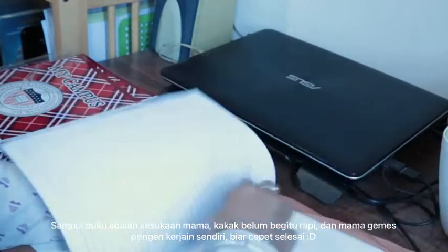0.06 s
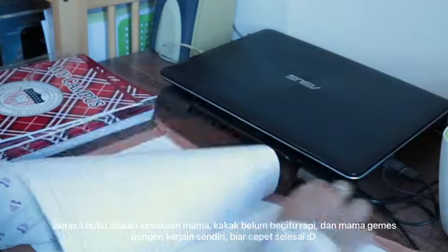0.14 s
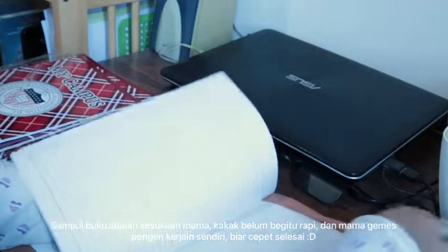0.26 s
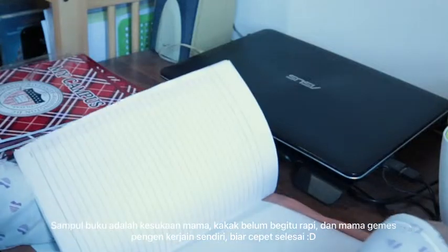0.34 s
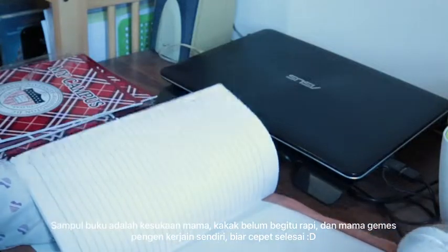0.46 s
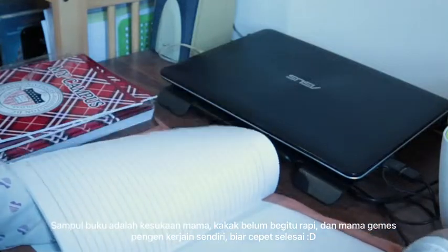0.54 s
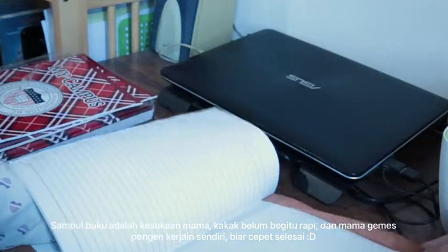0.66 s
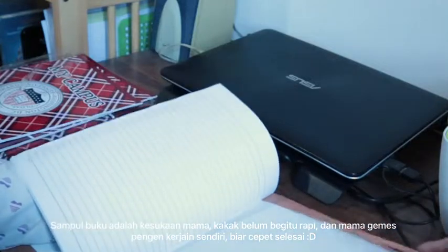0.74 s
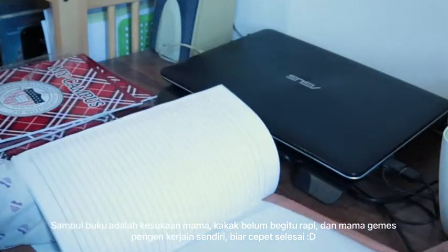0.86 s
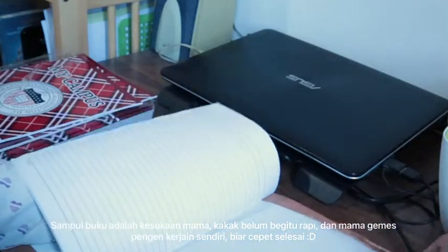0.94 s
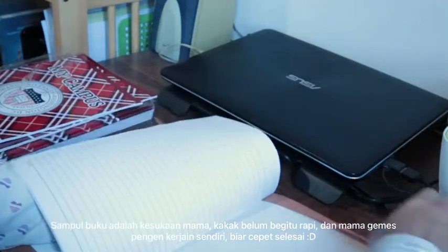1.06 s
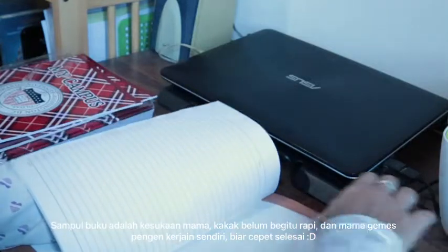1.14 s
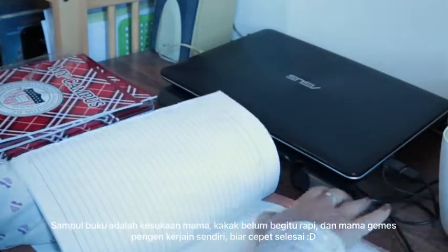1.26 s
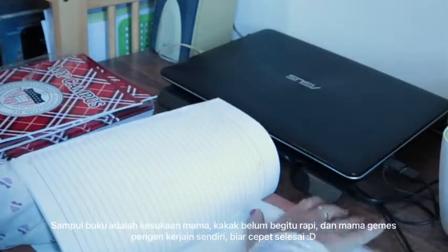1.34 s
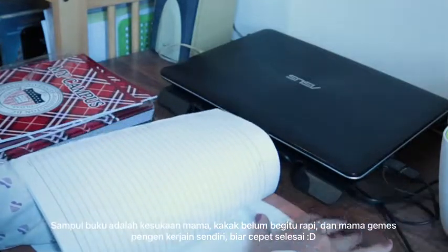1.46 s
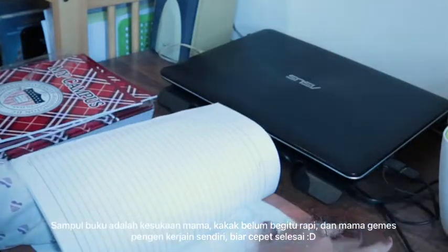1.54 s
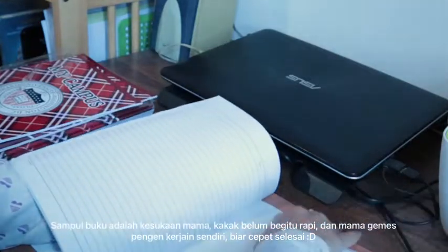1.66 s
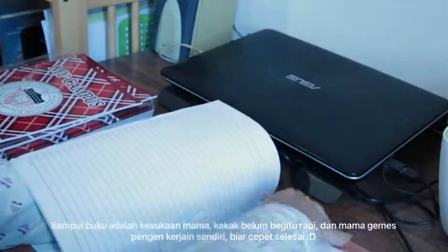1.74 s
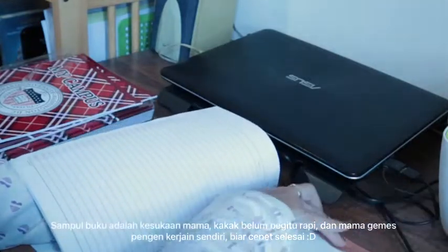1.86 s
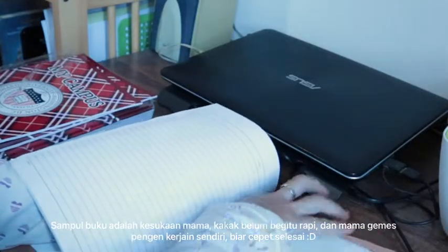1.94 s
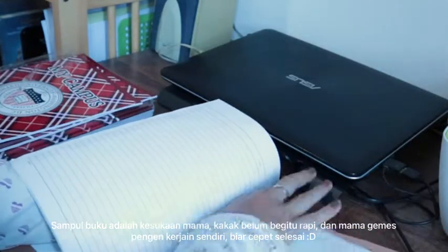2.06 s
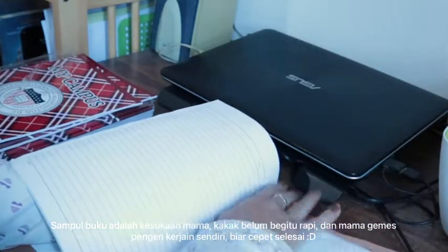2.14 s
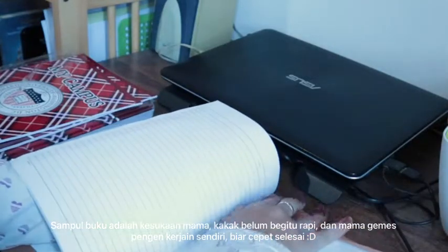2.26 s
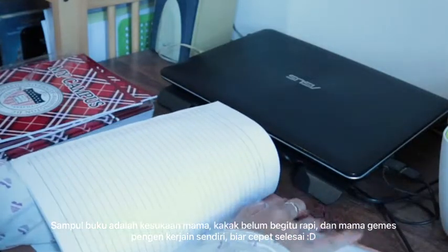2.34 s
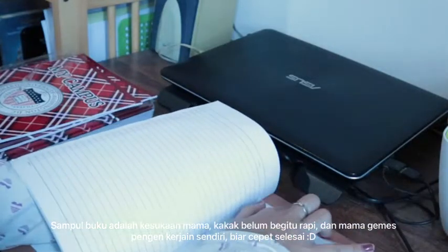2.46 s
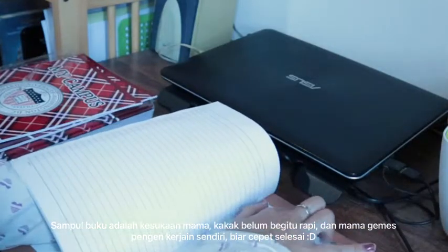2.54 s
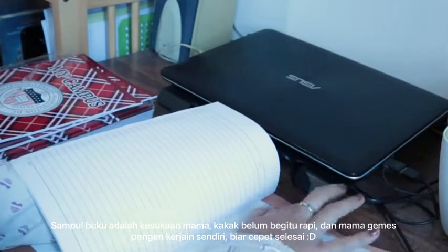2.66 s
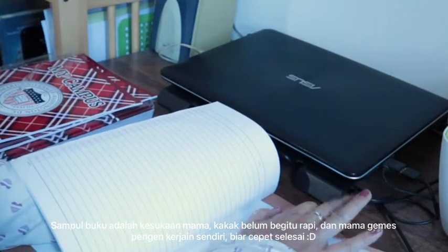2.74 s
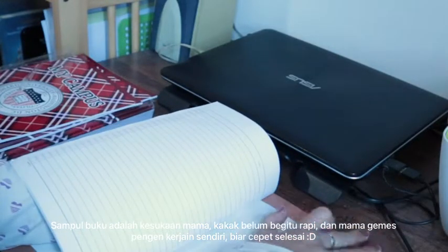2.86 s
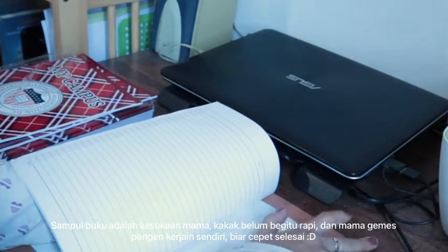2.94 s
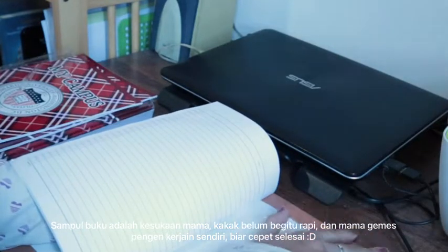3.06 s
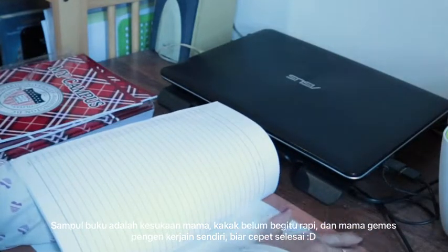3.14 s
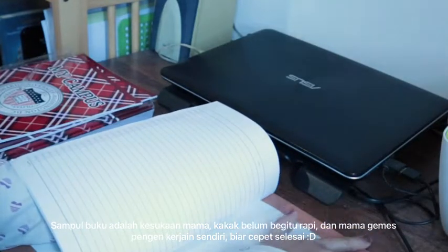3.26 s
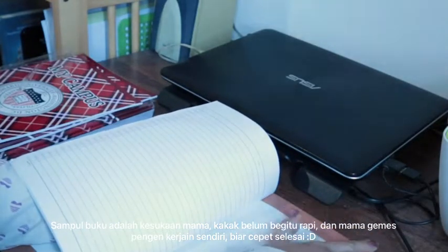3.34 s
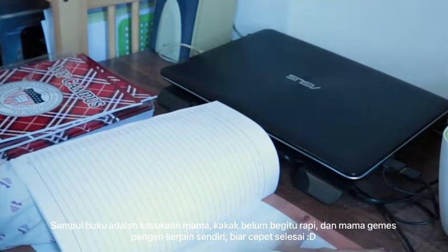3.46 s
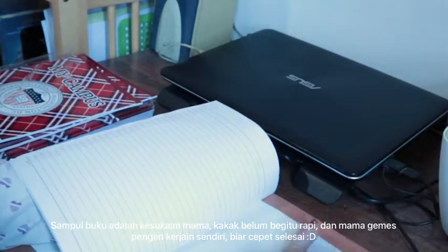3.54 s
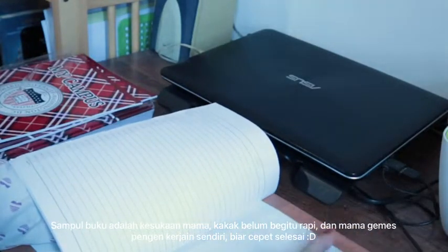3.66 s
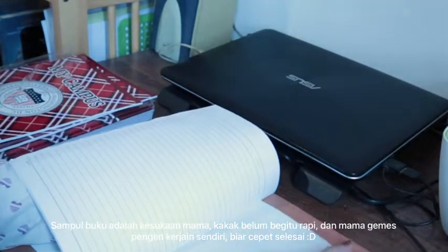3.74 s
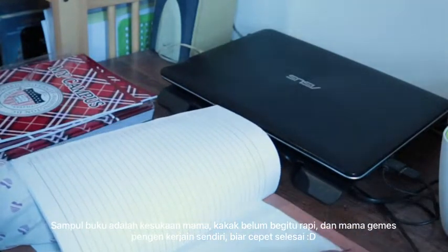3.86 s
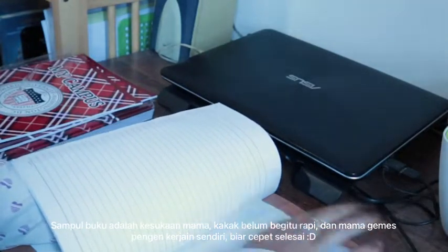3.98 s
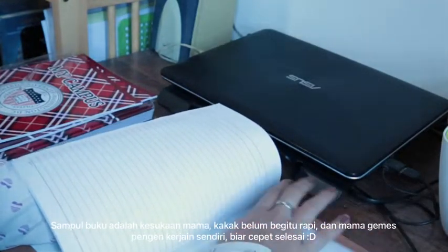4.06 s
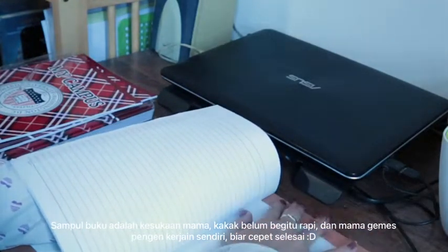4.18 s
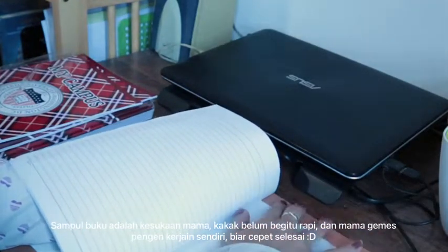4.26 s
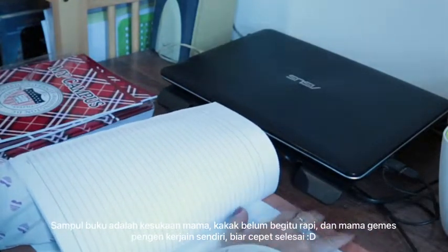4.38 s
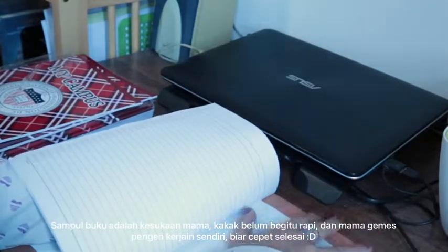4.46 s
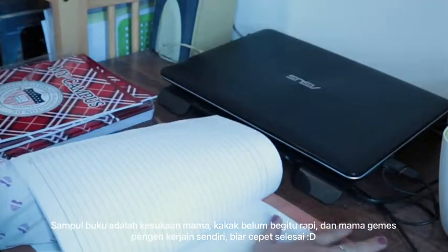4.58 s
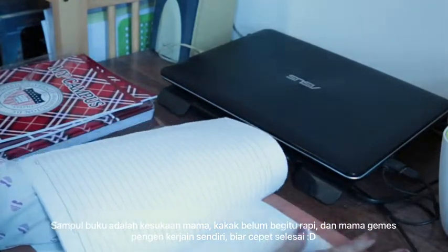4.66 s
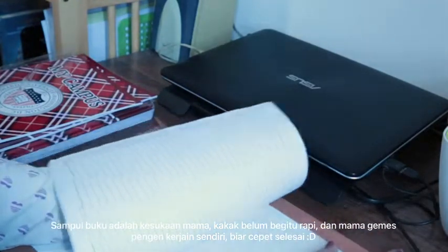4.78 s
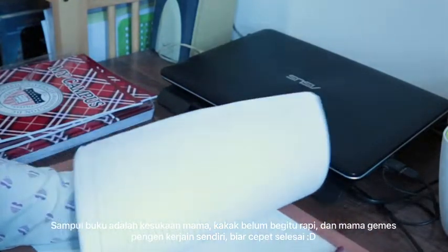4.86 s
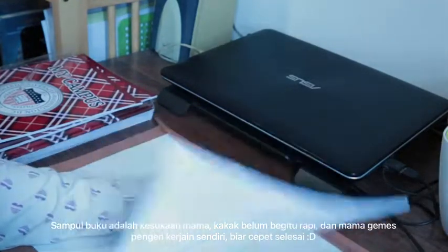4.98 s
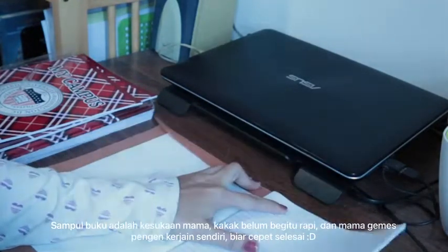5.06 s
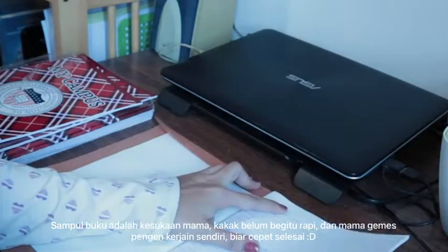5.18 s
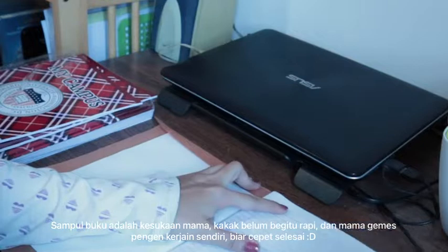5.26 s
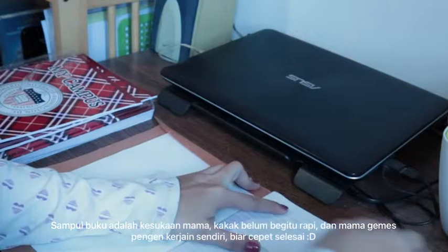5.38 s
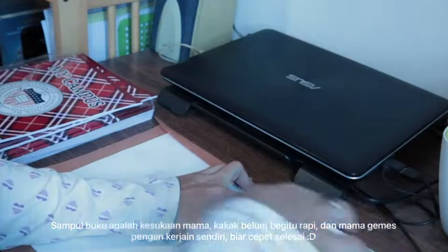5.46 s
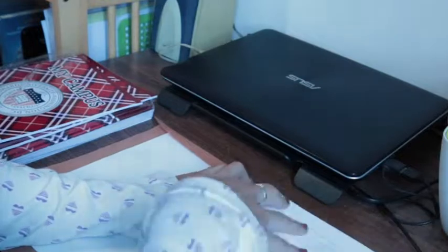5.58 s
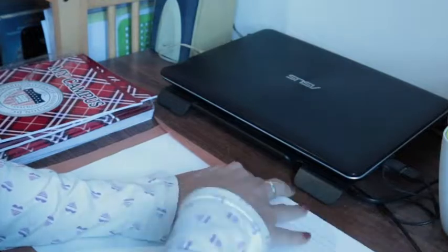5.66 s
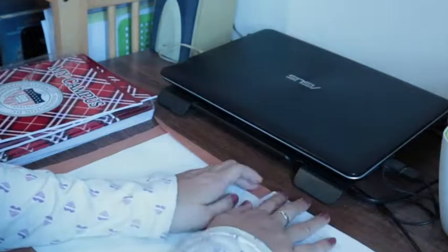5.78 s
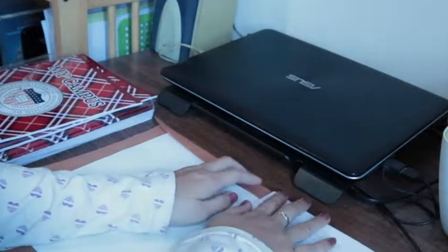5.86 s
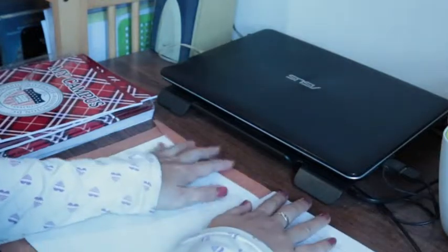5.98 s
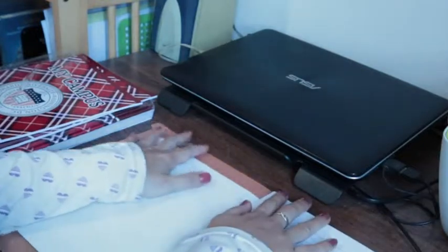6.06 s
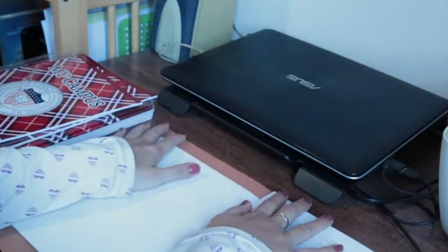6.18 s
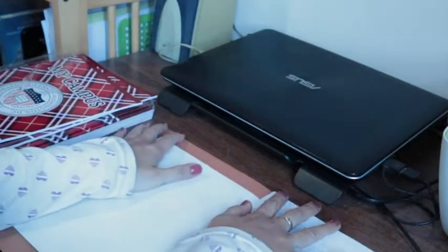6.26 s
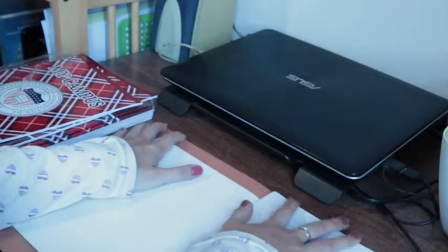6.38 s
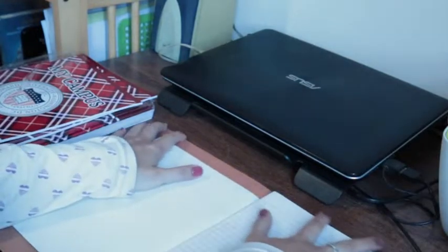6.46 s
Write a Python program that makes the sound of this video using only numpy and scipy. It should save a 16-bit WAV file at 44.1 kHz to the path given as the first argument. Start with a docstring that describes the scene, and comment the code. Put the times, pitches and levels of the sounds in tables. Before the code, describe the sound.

Close paper rustling and crackling in a small room, a sharp tap, then a loud page slap and soft thuds of hands on a desk.

```python
"""A wooden desk in a small room: hands smooth and handle sheets of paper and a notebook.
Rustle, skin hiss and page flexing are filtered noise and micro-slips, swelled by each hand stroke.
Snaps, taps and a loud slap are noise bursts ringing the paper; palms thud as decaying sines, the desk modes.
Sharp sounds and thuds feed random-tap room tails; a pair of close microphone ports hears all over a low rumble."""
import sys
import numpy as np
from scipy import signal
from scipy.fft import rfft, irfft
from scipy.io import wavfile
from scipy.ndimage import uniform_filter1d

SR = 44100
rng = np.random.default_rng(int(sys.argv[2]) if len(sys.argv) > 2 else 0)


def master(y):
    """Save y as 16-bit WAV."""
    cut = np.clip(np.atleast_2d(y).T, -1, 1)
    pcm = np.round(cut * 32767)  # scale
    wavfile.write(sys.argv[1], SR, pcm.astype(np.int16))


N = 287091

# Hand strokes over the sheet: top t/s, rise/s (10 ms minimum), fall/s, rustle level/dB, skin hiss level/dB,
# rustle centre f/Hz, crackle share (0-1)
HAND_STROKES = [(0.0, .05, 0.13, -38, -51, 2540, 0.09), (0.12, 0.074, 0.12, -35, -40, 2220, 0),
                (0.29, 0.082, 0.078, -38, -43, 2900, 0.12), (0.4, 0.11, 0.6, -46, -54, 1710, 0.1),
                (0.58, 0.012, 0.041, -41.5, -44, 1930, 0.8), (0.671, 0.04, 0.042, -27, -34.5, 2020, 0.16),
                (0.74, 0.051, 0.074, -32.5, -40.5, 2110, 0.23),
                (0.92, 0.058, 0.057, -34, -43.5, 1900, 0.01), (1.113, 0.0076, 0.13, -41, -50, 2050, 0.9),
                (1.25, 0.27, 0.45, -43.5, -57, 1760, 0.2), (1.41, 0.12, 0.053, -39.5, -45.5, 2050, 0.7),
                (1.5, 0.097, 0.088, -41, -45.5, 2320, 0.04), (1.62, 0.044, 0.14, -43, -50.5, 2240, 0),
                (1.8, 0.2, 0.091, -42, -63, 2390, 0), (1.89, 0.15, 0.094, -43, -50, 2060, 0.07),
                (2.01, 0.05, 0.086, -47, -52.5, 2020, 0.55), (2.17, 0.077, 0.066, -40.5, -48, 1960, 0.1),
                (2.26, 0.14, 0.11, -46.5, -47.5, 2690, 0.04), (2.41, 0.082, 0.12, -45.5, -48.5, 2160, 0),
                (2.61, 0.16, 0.15, -47, -50.5, 2000, 0.14), (2.85, 0.09, 0.16, -44.5, -45.5, 2750, 0.2),
                (2.99, 0.051, 0.08, -63, -47, 2130, 0.1), (3.04, 0.055, 0.11, -50, -50.5, 2670, 0),
                (3.21, 0.16, 0.42, -44, -47, 2680, 0.54), (3.37, 0.041, 0.17, -39, -44, 2750, 0),
                (3.7, 0.43, 0.13, -42, -49.5, 2190, 0.04), (3.86, 0.048, 0.77, -45, -48, 2020, 0),
                (4.169, 0.021, 0.04, -37, -49, 2305, 0.95), (4.31, 0.056, 1, -50.5, -65, 2350, 0.17),
                (4.5, 0.38, 0.96, -52, -47.5, 2300, 0.04), (4.68, 0.17, 0.2, -39.5, -45.5, 2630, 0.13),
                (4.85, 0.39, 0.18, -41.5, -62, 1880, 0), (5.06, 0.12, 0.037, -48, -53, 2100, 0.7),
                (5.16, 0.11, 0.14, -38.5, -76, 1880, 0), (5.29, 0.09, 0.088, -40, -51.5, 1950, 0.04),
                (5.36, 0.08, 0.053, -45, -48, 2250, 0.7), (5.75, 0.15, 0.11, -45, -52.5, 1920, 0.2),
                (5.81, 0.058, 0.028, -49, -67, 1320, 0.2), (5.89, 0.04, 0.069, -46.5, -46, 3430, 0.1),
                (6.0, 0.17, 0.23, -41.5, -43.5, 2700, 0.1), (6.48, 0.21, .2, -41, -43.5, 2250, 0)]
# Dull flexing of the pages: t/s, level/dB
PAGE_FLEXING = [(0.0, -44.5), (0.2, -42.5), (0.55, -46.5), (1.0, -48), (1.4, -48.5), (2.2, -49.5),
                (2.75, -50), (3.1, -49.5), (3.35, -49.5), (3.55, -45), (3.9, -49.5), (4.3, -48),
                (4.95, -47.5), (5.15, -51.5), (5.6, -54.5), (5.95, -48), (6.51, -49)]
# Sharp paper sounds: snaps, taps and a loud slap:
# t/s, peak level/dB, ring f/Hz, ring boost/dB, treble/dB, t60/ms (60 maximum), bass/dB
SHARP_SOUNDS = [(0.026, -23.5, 2600, -9, 0, 43, -2), (0.111, -20.5, 2870, 10, 3, 18, 8),
                (0.12, -22.5, 860, 17.5, 3, 71, -4), (0.148, -18.5, 1260, 8.5, -8, 22, 9),
                (0.235, -20.5, 2530, 9.5, 12, 51, 11), (0.274, -25, 2920, 10, 8, 25, -8),
                (0.284, -21.5, 2800, 7, 8, 44, -10), (0.298, -12.5, 3020, 8, 17, 13.3, 10),
                (0.447, -18.5, 1200, 4.5, -27, 29, -1), (0.502, -25, 1300, 15, -5, 38, -9),
                (0.513, -22.5, 1440, 12, 9, 33, -1), (0.575, -27, 1980, -3, 33, 20, -2),
                (0.585, -22, 2820, 4, 4, 27, -5), (0.624, -23, 1670, 13, 3, 33, 0),
                (0.632, -18, 1690, 18.5, -3, 53, 4), (0.649, -24, 1500, 17, 7, 18, 3),
                (0.656, -18, 1900, 8, 12, 20, -5), (0.6605, -9.5, 1800, 10, 8, 20, -10),
                (0.665, -18, 2300, 6, 18, 21, -1), (0.674, -15, 1900, -1, 5, 47, 2.5),
                (0.694, -12.5, 1500, 8, 11, 35, -3), (0.7245, -7, 2380, 17.5, 17, 20, -6),
                (0.729, -21, 1990, 7, 8, 18, 10), (0.929, -19.5, 2230, -4.5, 8, 27, -9),
                (0.944, -33, 2270, -9, -5, 16, 6), (1.107, -27, 1650, -12, 12, 22, -1),
                (1.22, -22, 880, 12, -20, 20, 8), (1.273, -28.5, 2030, 15, -9, 16, 6),
                (1.245, -29, 2680, 17, 4, 18, -8), (1.307, -27, 2530, 4, -3, 46, -6),
                (1.325, -21.5, 1200, 9, -2, 54, -9), (1.339, -17.5, 2070, 5, -15, 87, -7),
                (1.373, -18.5, 1640, 11, 0, 20, -3), (1.378, -18.5, 2190, 5, -2, 56, -27),
                (1.402, -16.5, 2170, -7, 9, 17, -8), (1.47, -23, 2270, 28, 0, 12, -13),
                (1.482, -20, 2360, 16, -2, 10, -10), (1.502, -19.5, 1980, 4.5, 25, 17.4, -9),
                (1.621, -29.5, 2370, 19, 17, 22, -2), (1.868, -18.5, 2000, 18, -19, 7.1, 13),
                (1.87, -18, 1670, 5, -19, 21, -3), (1.909, -23, 2600, 6, 3, 22, -1),
                (1.919, -24.5, 2070, 11, 0, 20, 11), (1.928, -24.5, 2110, 4, 3, 32, -21),
                (2.033, -30.5, 1520, 9, -15, 11, 0), (2.126, -34, 3670, 30, 11, 28, -9),
                (2.298, -34, 2290, 19, 10, 16, -2), (2.417, -28, 1900, 6, 4, 41, -7),
                (2.458, -28.5, 1360, 3, 9, 18, -3), (2.498, -25.5, 3400, 3, -2, 11, -3),
                (2.601, -26, 3500, 11, 16, 7.3, -5), (2.603, -19, 1300, 6.5, 18, 19, 2),
                (2.792, -20.5, 1620, -12, 16, 19, -4), (2.804, -24.5, 1510, 19, 1, 31, -9),
                (2.8318, -17, 3220, 14, 22, 14, -3), (2.884, -21, 1580, -6, 21, 22, -3),
                (2.893, -28.5, 1500, 10, 0, 15, -10), (2.909, -26, 2400, -6, 0, 10, -6),
                (2.938, -32, 2270, 1, 1, 20, 1), (2.961, -14.5, 2140, 10, 28, 16, -10),
                (2.995, -35, 2100, 2, 0, 14, 0.5), (3.032, -24, 3040, 6, 7, 18, -5),
                (3.127, -25.5, 2550, 13, 7, 19, -17), (3.137, -23, 3100, 8, 15, 14, -15),
                (3.154, -31, 2600, 6, 17, 11, -13), (3.174, -26, 2500, 6, 5, 25, -10),
                (3.182, -22.5, 2940, 18, 12, 36, -14), (3.204, -24, 3330, 25, 10, 9.1, -15),
                (3.214, -26, 2710, 17, 10, 15, -7), (3.244, -28, 1620, 15, 11, 34, -15),
                (3.275, -25, 2980, 0, 9, 10, -5), (3.294, -25, 3320, 16, 7, 21, -17),
                (3.311, -21, 2000, 4, 10, 22, -5), (3.341, -13.5, 2400, -1, 8, 6.7, -16),
                (3.343, -13.5, 3400, 12, 12, 7.1, -10), (3.35, -21, 4000, 17, 17, 9, -14),
                (3.366, -19, 3900, 5, 27, 50, -13), (3.384, -32, 3400, 22, 8, 12, -12),
                (3.405, -25, 3000, 10, 0, 21, -13), (3.412, -27, 3020, 12, -2, 10, -12),
                (3.428, -26, 3120, 16, 3, 14, -16), (3.494, -30.5, 2910, 11, 5, 11, -13),
                (3.504, -28.5, 2960, 16, 14, 16, -19), (3.556, -23.5, 860, 17, -32, 34, -10),
                (3.865, -4.5, 2410, 5, -24.5, 12.6, -8), (3.869, -11.5, 1980, 1, -9, 24, 1.5),
                (3.883, -21, 2070, 12, -5, 33, -1), (4.142, -28, 2160, 10, 4, 18, 12),
                (4.157, -22, 1474, -4, 3, 24, 2), (4.802, -14.5, 3080, 6.5, 12, 10, -30),
                (5.0236, -26, 2200, 12, 0, 16, -1), (5.0256, -14, 2400, 19, 3, 7.6, 5),
                (5.028, -0.5, 2500, 9, -8, 10, 6.5), (5.0308, 1.5, 2110, 12, -2, 16, 0),
                (5.033, -9.5, 790, 18.5, -27, 28, -6.5), (5.037, -5.5, 2600, 10, -21, 16, 1),
                (5.0493, -15, 1800, -2, -4, 8.6, -3), (5.059, -16.5, 850, 26, -24, 11, -2),
                (5.0615, -12.5, 1880, 21, -18, 16, -5), (5.084, -23, 2300, 6, -10, 13, -4),
                (5.202, -28, 2370, 24, -15, 16, -8), (5.227, -22.5, 1410, 4, -14, 26, 3),
                (5.244, -31, 1300, 18, -2, 18, -7), (5.37, -29, 2260, 13, 13, 21, -6),
                (5.64, -29, 1480, 28, -40, 10, -5), (5.747, -27, 1530, 1, -34, 55, 3),
                (5.762, -14.5, 1800, 1, -32, 19, -3), (5.769, -21.5, 940, 27, -38, 12, 10),
                (5.776, -21, 1300, -2, -27, 18, 8), (5.822, -30, 910, 11, -18, 25, 7),
                (5.876, -28, 1390, 17, -12, 12, 10)]
# Palms and notebook landing on the desk: t/s, peak level/dB, centre of the blow f/Hz
DESK_THUDS = [(0.183, -25, 317), (0.197, -35, 320), (0.239, -41, 197), (0.297, -25, 353), (0.307, -42, 100),
              (0.316, -37, 108), (0.722, -29.5, 420), (1.378, -40, 76.5), (1.898, -38, 108),
              (2.794, -30, 147), (2.807, -31.5, 150), (3.56, -33.5, 256), (3.87, -28.5, 244),
              (4.161, -27.5, 125), (4.188, -34, 99.6), (5.028, -38, 444), (5.045, -32, 78),
              (5.766, -27, 111), (5.775, -30.5, 380), (5.787, -30, 88.8), (5.799, -40, 99),
              (5.824, -50, 348), (5.838, -25.5, 110), (5.854, -29.5, 100), (5.871, -31.5, 140),
              (5.896, -43, 102), (5.914, -47, 90), (5.957, -41, 50.7), (5.997, -36.5, 50.4)]
# Relative spectra of the sources: f/Hz, level/dB per Hz
RUSTLE_SPECTRUM = [(290, -66), (500, -2.5), (904, -5.5), (1100, -7), (1380, -7), (2190, -9), (3910, -6.5),
                   (5350, -6), (9000, -4), (11700, -62), (19800, -120)]
HISS_SPECTRUM = [(2650, -63), (4500, -3.5), (6990, -7.5), (7320, -9.5), (8960, -6.5), (11900, -5.5),
                 (14000, -24), (15500, -40)]
FLEX_SPECTRUM = [(88, -32), (150, -5.5), (225, 0), (347, -3), (441, -3.5), (1380, -17), (1500, -13),
                 (1950, -70), (3300, -120)]
RUMBLE_SPECTRUM = [(12, -70), (20, 5), (49, 1), (92, -1), (161, -6.5), (180, -15.5), (306, -28.5),
                   (597, -14.5), (649, -24), (705, -16), (881, -23.5), (12800, -41), (15500, -88)]
SHARP_SPECTRUM = [(88, -13), (150, -12.5), (471, -5.5), (1000, -6), (1240, -4.5), (1600, -5), (2270, -6),
                  (4060, -8.5), (4930, -15), (6600, -15.5), (8000, -29.5), (11000, -25), (13000, -44),
                  (15500, -67)]
# Areas of the sheet that ring: f/Hz, width/Hz
SHEET_PATCHES = [(800, 370), (1300, 1130), (1900, 1070), (2700, 1530), (3800, 1360), (5500, 4700)]
# Modes of the desk top: f/Hz, relative level/dB, t60/s
DESK_MODES = [(50, 2.5, 0.28), (71.5, 6.5, 0.044), (95.6, 11.5, 0.087), (112, 3, 0.22), (160.4, 0, 0.24),
              (184, -10, 0.026), (240.6, -4.5, 0.17), (310, 14.5, 0.021), (393, 6.5, 0.075),
              (595, 6.5, 0.043)]
# Room decay: f/Hz, t60/s
ROOM_DECAY = [(200, 0.34), (530, 0.45), (1390, 0.3), (3680, 0.3), (9700, 0.091)]
# Likeness of the two ports: f/Hz, likeness (0-1)
PORT_LIKENESS = [(40, 0.998), (90, 0.995), (200, 0.83), (350, 0.75), (600, 0.45), (2000, 0.86),
                 (4500, 0.33), (8000, 0.35), (15000, 0.21)]
# Phase by which the left port leads: f/Hz, lead/rad
PORT_LEAD = [(40, 0.01), (200, .04), (600, .12), (1800, .22), (3360, 0.05), (4650, -.6), (6460, -3.0),
             (15000, -3.0)]
# Balance, left minus right: f/Hz, level/dB
PORT_BALANCE = [(60, -.1), (500, -.5), (2000, -1.4), (5000, -.6), (15000, -1)]

# Fade of a stroke one rise before or one fall after its top; exponent of the fade
RUSTLE_DROP_DB, HISS_DROP_DB, STROKE_EXPONENT = 12, 14, 1.26
SHAKE_DB, SHAKE_T60_S = -10, 0.22  # page shake after a thud, relative to the thud
RUMBLE_DB = -49.5
BURST_RISE_S, THUD_RISE_S = 0.00099, 0.00084
TREBLE_HZ, DULL_DB_PER_OCTAVE = 9100, 30  # treble corner; a softer contact lowers it
# Loud sharp sounds are nearest and least roomy: room dB at full scale, change in dB per dB
SHARP_ROOM_DB, SHARP_ROOM_SLOPE = -11.5, -0.18
THUD_ROOM_DB = -10.5
STRAY_DB, STRAY_HZ = -2.5, 4020  # sharp treble scattered off the sheet, unlike at the two ports
LOW_CUT_HZ, HIGH_CUT_HZ, CLIP_LEVEL = 38, 15600, 0.96
STFT_SAMPLES = 256


def gain_of(db):
    """Decibels to amplitude."""
    return 10 ** (np.asarray(db) / 20)


def evened(x):
    """Scales to rms 1."""
    return x / np.sqrt(np.mean(x ** 2) + 1e-20)


def read(points, hz):
    """Interpolates a table on a log-frequency axis."""
    f, value = np.transpose(points)
    return np.interp(np.log(hz + 1), np.log(f + 1), value)


def add(mix, s, sound):
    """Mixes a sound in at time s, in seconds."""
    part = mix[round(s * SR):][:len(sound)]
    part += sound[:len(part)]


def causal(gain_db):
    """Minimum-phase impulse response, by folded cepstrum, of a gain on rfft bins."""
    cepstrum = irfft(np.maximum(gain_db, -100) * np.log(10) / 20)
    half = len(cepstrum) // 2
    folded = np.concatenate([cepstrum[:1], 2 * cepstrum[1:half], np.zeros(half)])
    return irfft(np.exp(rfft(folded)))[:half]


def coloured(x, spectrum):
    """Passes x through a causal filter of the given spectrum."""
    response = causal(read(spectrum, np.fft.rfftfreq(4096, 1 / SR)))
    return signal.oaconvolve(x, response)[:N]


def flicker(seconds, depth_db):
    """Random gain wandering on the given time scale, with the given rms depth."""
    width = max(round(seconds * SR), 1)
    smooth = uniform_filter1d(rng.standard_normal(N), width)
    smooth = uniform_filter1d(smooth, width)
    return gain_of(depth_db * evened(smooth))


def slipping(share, median_slips_per_s, spread_db, flicker_db, grain_s):
    """Two strands of smooth sliding noise blended with clumped micro-slips of very uneven size."""
    clumps = flicker(0.012, 4.5)
    happens = rng.random(N) < median_slips_per_s * clumps / SR
    size_db = spread_db * np.minimum(rng.exponential(1, N), 2.6)
    slips = happens * gain_of(size_db)
    grain = np.exp(-np.arange(600) / (grain_s * SR))  # each slip is a very short burst
    bursts = evened(signal.oaconvolve(slips, grain)[:N])
    drive = np.sqrt(1 - share) + np.sqrt(share) * bursts
    drive *= flicker(0.0098, flicker_db)
    return drive * rng.standard_normal((2, N))


def friction(drive, spectrum, level):
    """Gives both strands the colour of the thing rubbed."""
    return level * np.array([evened(coloured(strand, spectrum)) for strand in drive])


def sheet(share, centre_hz):
    """Each area of the sheet slips on its own and rings in its own band; those near the centre lead."""
    ringing, power = 0, 0
    for hz, width_hz in SHEET_PATCHES:
        band = signal.butter(2, [hz - width_hz / 2, hz + width_hz / 2], "bandpass", fs=SR)
        weight = gain_of(-34.0 * np.log(hz / centre_hz) ** 2) * np.sqrt(width_hz)
        slips = slipping(share, 110, spread_db=5.5, flicker_db=1.65, grain_s=0.0019)
        ringing = ringing + weight * evened(signal.lfilter(*band, slips))
        power = power + weight ** 2
    return ringing / np.sqrt(power)


def strokes(t):
    """Each stroke swells to its top and fades; rustle power weights the centre and crackle."""
    top, rise, fall, rustle_db, hiss_db, centre_hz, share = np.transpose(HAND_STROKES)[:, :, None]
    before = (top - t) / np.maximum(rise, .01)
    after = (t - top) / np.maximum(fall, .01)
    away = np.maximum(before, after) ** STROKE_EXPONENT
    rustle_power = gain_of(rustle_db - RUSTLE_DROP_DB * away) ** 2 + 1e-12
    hiss_power = gain_of(hiss_db - HISS_DROP_DB * away) ** 2 + 1e-12
    rustle_sum = rustle_power.sum(axis=0)
    lead = rustle_power / rustle_sum
    rustle, hiss = np.sqrt(rustle_sum), np.sqrt(hiss_power.sum(axis=0))
    return rustle, hiss, (lead * centre_hz).sum(axis=0), (lead * share).sum(axis=0)


def flexing(t):
    """The pages flex slowly, and shake after every thud."""
    s, db, _ = np.transpose(DESK_THUDS)[:, :, None]
    shake_power = (t > s) * gain_of(db + SHAKE_DB - 60 * abs(t - s) / SHAKE_T60_S) ** 2
    slow = gain_of(np.interp(t, *np.transpose(PAGE_FLEXING)))
    return np.sqrt(slow ** 2 + shake_power.sum(axis=0))


def hands():
    """Rustle of the sheet, hiss of skin on paper and dull flexing of the pages, all friction noise."""
    steps_s = np.arange(0, N / SR + .002, .002)
    t = np.arange(N) / SR
    curves = (*strokes(steps_s), flexing(steps_s))
    rustle_level, hiss_level, centre_hz, share, flex_level = (np.interp(t, steps_s, c) for c in curves)
    share = np.clip(share, 0, 1)
    skin = slipping(0.5 * share, 400, spread_db=3.5, flicker_db=1.17, grain_s=0.0015)
    pages = slipping(0.11 * share, 120, spread_db=8, flicker_db=0.0, grain_s=0.004)
    rustle = friction(sheet(share, centre_hz), RUSTLE_SPECTRUM, rustle_level)
    hiss = friction(skin, HISS_SPECTRUM, hiss_level)
    flex = friction(pages, FLEX_SPECTRUM, flex_level)
    return rustle + hiss + flex


def rumble():
    """Murmur of the room: low rumble and faint hiss as filtered noise, wavering slightly."""
    pair = [evened(coloured(n, RUMBLE_SPECTRUM)) for n in rng.standard_normal((2, N))]
    return gain_of(RUMBLE_DB) * np.array(pair) * flicker(0.16, 1.0)


def sharp_sounds():
    """Snaps, taps and a slap: short bursts ringing the paper around; returns direct sound and room feeds."""
    direct, feeds = np.zeros(N), np.zeros((3, N))  # three spots on the desk, each with its own echoes
    hz, t = np.fft.rfftfreq(2048, 1 / SR), np.arange(3000) / SR
    noise = rng.standard_normal((len(SHARP_SOUNDS), len(t)))
    spots = rng.integers(0, len(feeds), len(SHARP_SOUNDS))
    for row, n, spot in zip(SHARP_SOUNDS, noise, spots):
        s, db, ring_hz, boost_db, treble_db, t60_ms, bass_db = row
        ring_db = boost_db / (1 + (np.log((hz + 1) / ring_hz) / 0.32) ** 2)
        corner_hz = TREBLE_HZ * 2 ** (min(treble_db, 0) / DULL_DB_PER_OCTAVE)
        tilt_db = treble_db / (1 + (corner_hz / (hz + 1)) ** 4)
        tilt_db += bass_db / (1 + (hz / 1000) ** 4)
        decay = gain_of(-60 * t * 1000 / np.clip(t60_ms, 4, 60))
        burst = n * (1 - np.exp(-t / BURST_RISE_S)) * decay
        burst *= abs(n) ** 0.5  # a few spikes stand out
        burst[round(BURST_RISE_S * SR)] += 4.0  # one sharp kick near the start
        patch = causal(read(SHARP_SPECTRUM, hz) + ring_db + tilt_db)
        sound = signal.fftconvolve(burst, patch)
        sound *= gain_of(db) / abs(sound).max()
        add(direct, s, sound)
        feed = patch * np.linalg.norm(sound) / np.linalg.norm(patch)
        add(feeds[spot], s, feed * gain_of(SHARP_ROOM_DB + SHARP_ROOM_SLOPE * db))
    return direct, feeds


def thuds():
    """A soft blow rings the desk top, mostly in the modes near the pitch its softness sets."""
    out, t = np.zeros(N), np.arange(SR // 2) / SR
    mode_hz, mode_db, t60_s = np.transpose(DESK_MODES)[:, :, None]
    spots = rng.uniform(0.5, 1, (len(DESK_THUDS), len(DESK_MODES), 1))  # spot struck favours some modes
    spots *= (-1.) ** np.arange(len(DESK_MODES))[:, None]  # neighbouring modes start in opposite sense
    for (s, db, hz), spot in zip(DESK_THUDS, spots):
        share_db = mode_db - 7.3 * np.log(mode_hz / hz) ** 2
        modes = spot * gain_of(share_db - 60 * t / t60_s) * np.sin(2 * np.pi * mode_hz * t)
        ring = modes.sum(axis=0) * (1 - np.exp(-t / THUD_RISE_S))
        add(out, s, gain_of(db) * ring / abs(ring).max())
    return out


def room(x):
    """Two tails of sparse random taps, each band dying at its own speed."""
    taps = np.zeros((2, SR // 2))
    slots = np.arange(100, SR // 2 - 20, 20)
    at = slots + rng.integers(0, 20, (2, len(slots)))
    np.put_along_axis(taps, at, rng.choice([-1., 1.], at.shape), 1)
    hz, t, bands = signal.stft(taps, SR, nperseg=STFT_SAMPLES)
    decay = gain_of(-60 * t / read(ROOM_DECAY, hz)[:, None])
    tail = signal.istft(bands * decay, SR, nperseg=STFT_SAMPLES)[1]
    return signal.fftconvolve(x[None], tail / np.linalg.norm(tail[0]), axes=1)[:, :N]


def ports(x, other):
    """The two ports share part of the sound, with a phase lead and balance; the rest is unrelated."""
    hz = np.fft.rfftfreq(N, 1 / SR)
    same = np.clip(read(PORT_LIKENESS, hz), 0, 1)
    shared = np.sqrt((1 + same) / 2) * rfft(x)
    apart = np.sqrt((1 - same) / 2) * rfft(other)
    balance = gain_of(read(PORT_BALANCE, hz) / 2)
    left = (shared + apart) * balance
    right = (shared - apart) / balance * np.exp(-1j * read(PORT_LEAD, hz))
    return irfft(np.array([left, right]), N)


def scene():
    """All sources and their room tails, heard by the pair of ports."""
    wide = hands() + rumble()
    sharp, feeds = sharp_sounds()
    knocks = thuds()
    wide = wide + sum(room(feed) for feed in feeds) + room(gain_of(THUD_ROOM_DB) * knocks)
    scatter = evened(rng.standard_normal(40)) / np.sqrt(40)  # about one millisecond of glints
    treble = signal.butter(2, STRAY_HZ, "highpass", fs=SR, output="sos")
    stray = signal.sosfilt(treble, signal.oaconvolve(sharp, scatter)[:N])
    return ports(wide[0] + sharp + knocks, wide[1] + gain_of(STRAY_DB) * stray)


def record(dry):
    """The microphone drops the deepest bass; the input clips at its limit; a low-pass sets the band."""
    low_cut = signal.butter(2, LOW_CUT_HZ, "highpass", fs=SR, output="sos")
    held = np.clip(signal.sosfilt(low_cut, dry), -CLIP_LEVEL, CLIP_LEVEL)
    high_cut = signal.firwin(1023, HIGH_CUT_HZ, window=("kaiser", 9), fs=SR)
    return signal.oaconvolve(held, high_cut[None], "same")


dry = scene()
out = record(dry)
master(out)
```